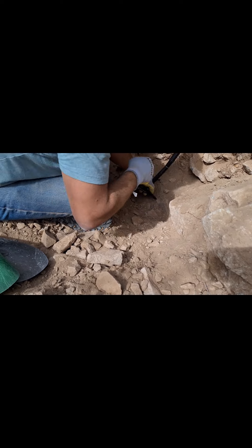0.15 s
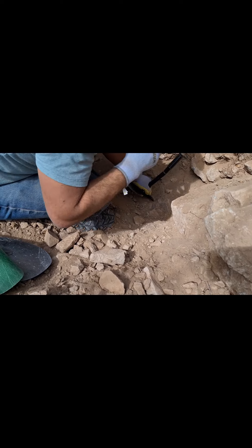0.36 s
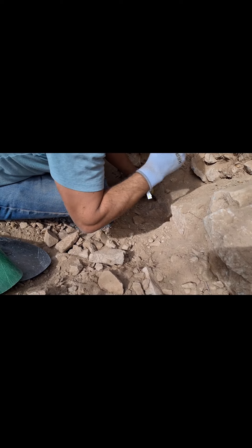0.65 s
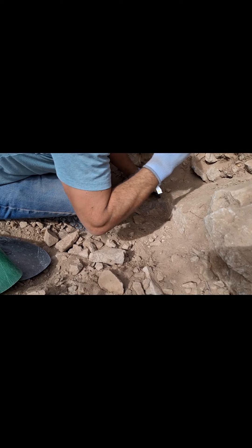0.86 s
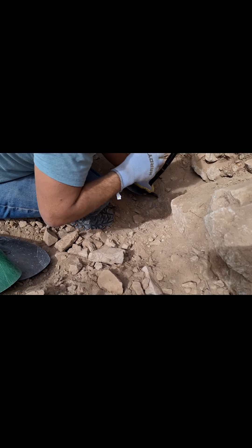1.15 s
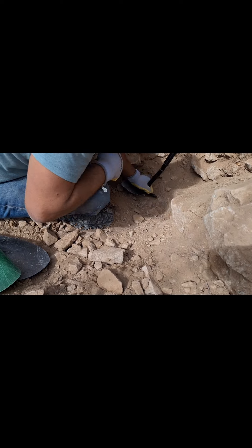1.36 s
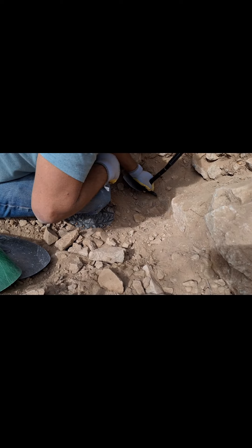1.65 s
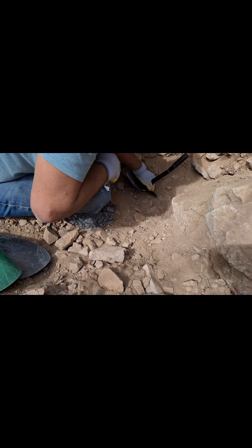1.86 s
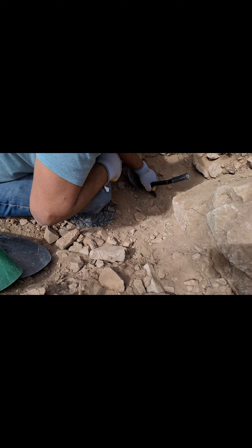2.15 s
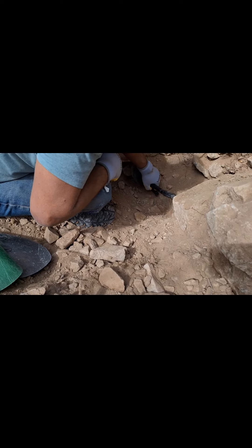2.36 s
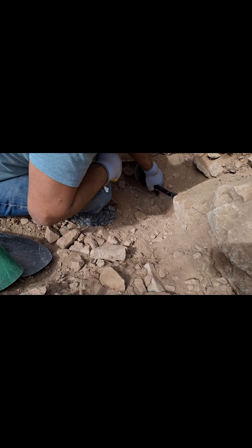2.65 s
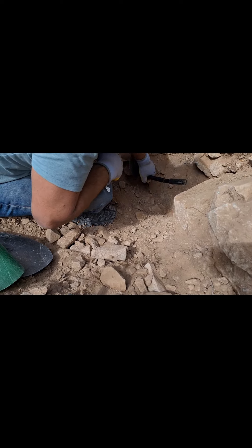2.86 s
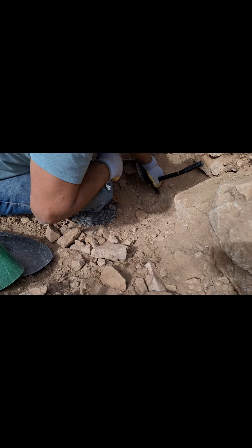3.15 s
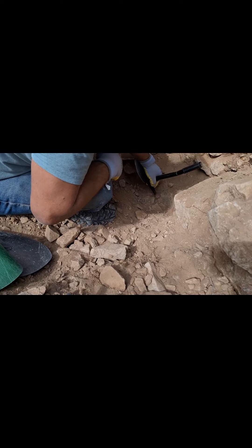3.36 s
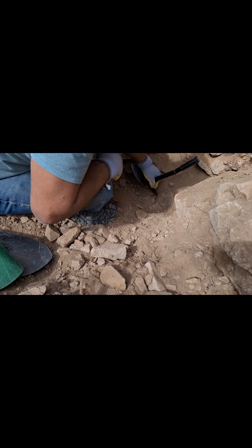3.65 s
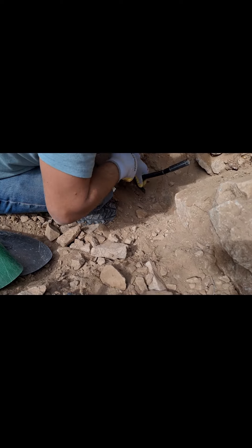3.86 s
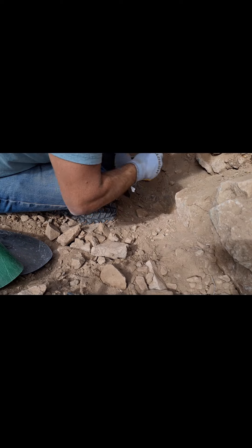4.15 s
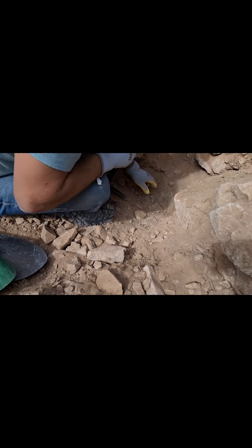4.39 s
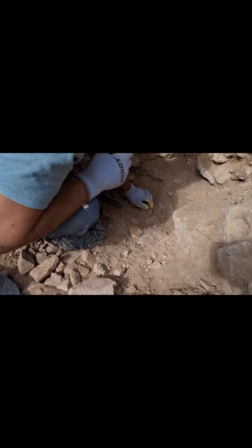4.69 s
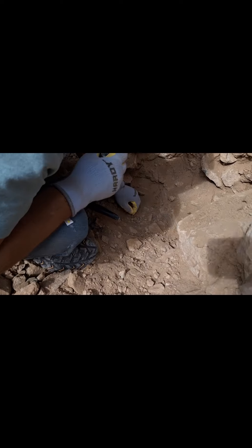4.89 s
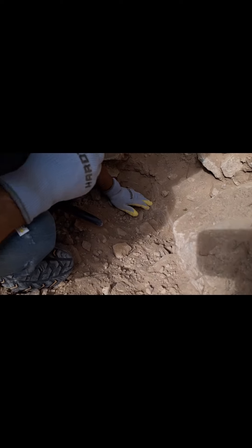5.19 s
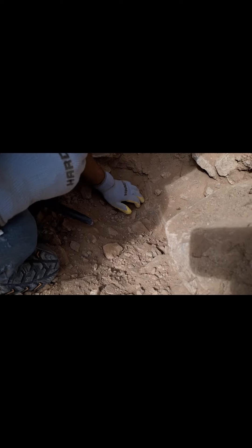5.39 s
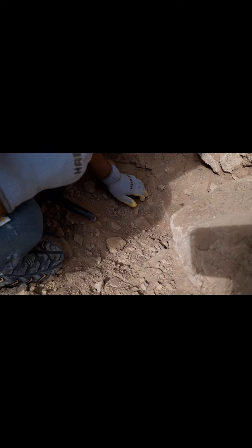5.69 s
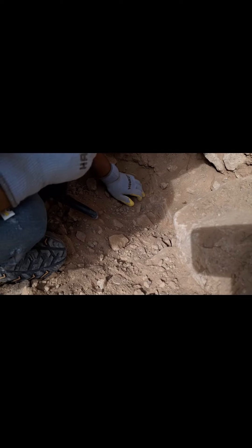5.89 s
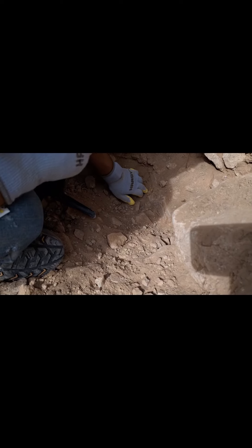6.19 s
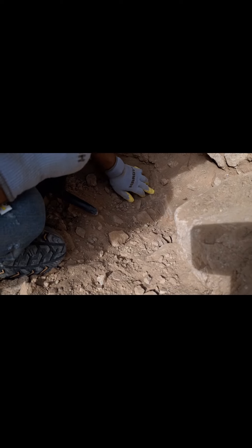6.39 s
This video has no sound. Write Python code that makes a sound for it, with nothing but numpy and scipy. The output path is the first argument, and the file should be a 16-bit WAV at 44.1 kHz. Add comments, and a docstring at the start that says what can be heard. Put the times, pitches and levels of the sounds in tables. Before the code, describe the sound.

Irregular chips and scrapes of a metal tool in packed earth and stones, slightly right of centre, crisp and dry without echo. Grit crackles brightly, pebbles tick, and low bumps shift clods. After about four seconds the metal stops; quieter, duller brushing by a gloved hand moves to the left and then back toward centre, with sand trickling and deep soft thumps. Quiet open air, light rumble and steady microphone hiss underneath.

```python
"""A gloved hand works a steel bar into hard, stony dirt, close to a hand-held camera outdoors.
Each chip or scrape is a burst of grit grains that rings bar, soil and pebbles.
After the bar is put down, the glove alone sweeps dirt and stones.
Loose dirt trickles between the crunches as two streams of grains; thuds are short low swings.
Swelling low rumble and steady microphone hiss, both coloured noise, lie underneath."""
import sys
import numpy as np
from scipy import signal
from scipy.fft import rfft, irfft, next_fast_len
from scipy.io import wavfile
from scipy.ndimage import uniform_filter1d, map_coordinates

SR = 44100
rng = np.random.default_rng(int(sys.argv[2]) if len(sys.argv) > 2 else 0)


def to_wav(sig):
    """Store sig (one row per channel, or 1-D mono) as 16-bit WAV at the path in sys.argv[1].

    Samples outside -1..1 are clipped; the rate is SR.
    """
    pcm = np.clip(np.atleast_2d(sig), -1, 1) * 32767
    pcm = np.round(pcm).astype(np.int16)
    wavfile.write(sys.argv[1], SR, pcm.T)  # frames by channels


N = 288119
PAD = next_fast_len(N)
T = np.arange(N) / SR  # time, s

# Each chip or scrape: peak t/s, crack level/dB, ring level/dB, favoured ring f/Hz, fine grit level/dB,
# rise/ms, fall/ms per 20 dB. Ring and grit levels are relative to the crack.
# Each layer below trims these levels and shortens the fall a little.
CRUNCHES = [(0.035, -50, 15.5, 1465, -11, 1.6, 18), (0.108, -65, 9.5, 636, 11, 20, 45),
            (0.121, -56.5, -3, 606, 7, 1.8, 13), (0.138, -61, 14, 1720, 2, 15, 23),
            (0.204, -79, -2, 755, 10.5, 27, 86), (0.292, -58, -0.5, 1010, 0, 4, 57),
            (0.34, -47.5, -2, 860, -4, 18.4, 35), (0.35, -35, -9, 1700, 4, 7.2, 11),
            (0.36, -33.5, -4.5, 1650, 1, 1.8, 19.5), (0.383, -56, 3, 1700, 1, 2, 32),
            (0.411, -58, -2, 970, 2, 14, 32), (0.442, -50.5, -2, 940, 8, 14, 24),
            (0.657, -73.5, 11.5, 1634, 6.5, 5.5, 39), (0.976, -56, -2, 1700, -5, 4.6, 26),
            (0.992, -52.5, 7, 1600, -10, 18, 24), (1.002, -52.5, -1.5, 1570, -6, 4.4, 50),
            (1.246, -57.5, 2.5, 1550, 5, 8, 17), (1.276, -72.5, 8, 1610, -2, 5.7, 39),
            (1.419, -55.5, 0, 1600, 0, 18, 22), (1.437, -54.5, 0, 1600, 0, 9.7, 30),
            (1.498, -44, -6, 1600, -3.5, 2.6, 14), (1.561, -38.5, -10, 925, 3.5, 2.3, 12.5),
            (1.588, -48.5, -3, 700, -1, 15, 38), (1.62, -34, -0.5, 920, 0, 23, 26),
            (1.658, -39.5, -3.5, 930, 5.5, 11.4, 8.5), (1.669, -35.5, -11, 1460, 4, 2.2, 29),
            (1.716, -63.5, 0.5, 1500, 5, 4, 13), (1.833, -43.5, 0.5, 1600, -7, 12, 12.5),
            (1.849, -59, -6.5, 630, 0, 3, 32), (1.891, -39.5, -7.5, 910, 0, 17.2, 23),
            (1.901, -29.5, -35, 1700, -5, 2.8, 20), (1.908, -28.5, -10.5, 1400, -3.5, 2.1, 20),
            (1.958, -46.5, 0.5, 1700, 1, 13, 9.5), (1.977, -40, -4, 1426, 2, 5.2, 30),
            (1.988, -29.5, -13, 1360, 4, 6.4, 10), (2.021, -42, -2.5, 994, 3, 30, 42),
            (2.135, -51, 2, 1540, -1, 3.9, 29), (2.164, -49, 0, 1550, 1, 3.7, 38),
            (2.186, -51.5, -2, 1600, -1.5, 6.4, 11), (2.303, -73, 7.5, 503, 11, 9, 27),
            (2.359, -58, 6, 523, 5.5, 35, 17.5), (2.383, -63, 6, 477, 1.5, 11, 28),
            (2.495, -48.5, -6, 1457, -5.5, 4.7, 30.5), (2.806, -45.5, -10, 1360, 0, 10, 24.5),
            (2.814, -31.5, -8.5, 1385, -1.5, 12.2, 35), (2.823, -28, -12.5, 940, 1, 6, 15.5),
            (2.829, -28, -12.5, 870, 0, 1.5, 19), (2.841, -33, 7.5, 493, -5, 3.3, 2.5),
            (2.865, -50.5, -1, 1490, -2, 7.3, 43), (2.879, -48, -3.5, 1480, 0, 6.4, 33),
            (2.918, -46.5, 3.5, 816, -7.5, 9.6, 30), (2.988, -75, 10, 1390, -13, 3.7, 23.5),
            (3.05, -87.5, 26, 676, 7, 7.4, 29.5), (3.075, -86, 22, 800, -1, 20, 37),
            (3.099, -78.5, 17.5, 830, -2, 3.7, 41), (3.188, -68, 2, 2590, 3, 27, 54),
            (3.251, -47, -5.5, 1840, -10, 7.1, 13), (3.267, -59, -2.5, 874, 2.5, 16, 46),
            (3.335, -64, -16, 2460, 2.5, 17, 57), (3.385, -50.5, -1.5, 1680, 2, 44, 25.5),
            (3.417, -42.5, -0.5, 874, 3, 38, 36), (3.688, -52, -0.5, 1450, -10, 2.8, 22),
            (3.703, -47, -4, 2540, -4.5, 11, 45.5), (3.723, -50.5, -7, 1510, 7.5, 2.4, 12),
            (3.783, -52.5, 2.5, 2020, 5.5, 4, 22.5), (3.811, -46, 0.5, 2570, -9, 3, 18),
            (4.142, -66.5, 0, 1720, -19.5, 8.3, 27), (4.195, -74, -1, 1670, -5, 6.7, 9),
            (4.23, -78, 13, 1690, 0, 13, 6), (4.263, -51, -2.5, 1730, -3.5, 16, 64.5),
            (4.325, -43, -4, 2200, -3, 7.2, 51), (4.397, -75, 2, 570, 4, 30, 45),
            (4.457, -66.5, 0.5, 1680, 2.5, 14, 21), (4.572, -78, 16.5, 576, -17, 4.6, 71),
            (4.734, -82, 18.5, 1600, -17, 84, 54), (4.774, -75.5, 15.5, 1300, -13, 62, 59),
            (4.85, -67, 10, 1310, -6, 130, 32), (4.876, -70.5, 20.5, 1340, -9, 15, 14),
            (4.98, -84, 21, 1100, -1, 74, 55), (5.21, -72.5, 0, 2050, 7, 35, 61.5),
            (5.297, -61, 0.5, 1420, 2, 86, 79), (5.347, -55.5, 5, 785, -5, 71, 59),
            (5.37, -57, 5.5, 1310, 4.5, 20, 36), (5.4, -59, 3, 920, -5, 66, 64),
            (5.621, -71, -0.5, 900, 7, 28, 31), (5.643, -62, 0.5, 700, 4, 15, 7),
            (5.661, -57.5, -8, 560, 2, 10, 9), (5.7, -64.5, 4, 840, -1, 110, 85),
            (5.745, -67.5, 2, 1495, -5, 16, 19), (5.914, -61, 5.5, 1310, 3, 7, 23),
            (5.952, -53, 6.5, 710, -3, 11.5, 10.5), (6.005, -73.5, 3, 914, -2, 140, 38),
            (6.172, -69, 7, 990, 15, 32, 24.5), (6.206, -69, 5.5, 790, 15.5, 17, 24),
            (6.273, -72.5, 2, 790, 17, 13, 37), (6.307, -58, -0.5, 2070, 1.5, 18, 19),
            (6.391, -60.5, -1.5, 1410, 2, 29, 41), (6.499, -68, 5.5, 804, 15, 12.5, 20),
            (6.519, -63, -1.5, 844, 9.5, 8.4, 15.5)]
# Where the digging lies as the camera turns: t/s, bearing (1 = well to the right, negative = left)
BEARING = [(0, 1.02), (2.3, 0.77), (3.8, 1.16), (4.3, 1.1), (5.2, -0.82), (6.53, -0.02)]
# Duller colour of loose fine grit throughout, and of crunched fine grit after 4.36 s: f/Hz, level/dB per Hz
SAND = [(3500, -29), (5500, -7.5), (7800, -1), (10000, -6), (13000, -2.5), (16000, -2)]

BAR_FLAT_S = 2.6  # the bar is then laid low to scrape and its lowest hum is choked
BAR_DOWN_S = 4.36  # from here on the glove alone sweeps dirt and stones
UPRIGHT, HELD = T < BAR_FLAT_S, T < BAR_DOWN_S
GLOVE_DAMP = 0.38  # cloth shortens every ring of soil and pebble to this share


def amplitude(db):
    """Turn decibels into a plain multiplier."""
    return 10 ** (np.asarray(db) / 20)


def unit(x):
    """Scale to an average (RMS) strength of 1."""
    return x / np.sqrt(np.mean(x ** 2))


def gains(points):
    """Read a colour table at every FFT bin."""
    hz, db = np.transpose(points)
    bin_hz = np.arange(PAD // 2 + 1) * SR / PAD
    return amplitude(np.interp(np.log(bin_hz + 1), np.log(hz), db))


def colour(x, points):
    """Filter by a colour; white input keeps its power."""
    return irfft(rfft(x, PAD) * unit(gains(points)), PAD)[..., :N]


def ring_modes(x, modes):
    """Strike a body that rings at several fading pitches; white input keeps its power, the tail is returned too."""
    t = np.arange(SR // 8) / SR
    body = np.zeros(len(t))
    for hz, db, t60 in modes:  # t60: seconds to fade by 60 dB
        body += amplitude(db - 60 * t / t60) * np.sin(2 * np.pi * hz * t) / np.sqrt(t60)
    body *= 1 - np.exp(-t / 0.00065)  # a contact takes a moment to build up
    return signal.fftconvolve(x, body[None] / np.sqrt(np.sum(body ** 2)))


def walk(rate):
    """Slow random wander of spread 1: noise averaged twice over 1/rate seconds."""
    k = int(SR / rate)
    return unit(uniform_filter1d(uniform_filter1d(rng.standard_normal(N), k), k))


def two_ports(mid, side, likeness):
    """Mix two noises into left and right that are alike by the given share."""
    return np.sqrt(1 + likeness) * mid + np.sqrt(1 - likeness) * side * np.array([[1], [-1]])


def grains(rate, spread_db, tail_ms, likeness):
    """Grit breaking: random clicks of very uneven size, at a rate per second, with short noisy tails."""
    clicks = rng.random(N) < rate / SR
    size = clicks * amplitude(spread_db * np.minimum(rng.exponential(size=N), 3.2))
    # every crunch breaks at least one fair-sized grain at its peak
    size[(np.transpose(CRUNCHES)[0] * SR).astype(int)] = amplitude(3.5)
    keep = np.exp(-2000 / (tail_ms * SR))  # amplitude falls to 1/e in tail_ms
    flutter = np.sqrt(signal.lfilter([1], [1, -keep], size ** 2))
    mid, side = rng.standard_normal((2, N))
    return unit(flutter * two_ports(mid, side, likeness))


def press(event, db, stretch):
    """How hard one event crushes grit: a ramp from first contact to the peak, then a fade."""
    s, *_, rise_ms, fall_ms = event
    rise_ms, fall_ms = max(rise_ms, 0.3), max(stretch * fall_ms, 1)
    start = max(int((s - rise_ms / 1000) * SR), 0)
    end = min(int((s + fall_ms / 400) * SR), N)  # 50 dB down
    near = slice(start, end)
    ms = 1000 * (T[near] - s)
    ramp = np.maximum(1 + ms / rise_ms, 0) ** 2
    return near, amplitude(db) * np.where(ms < 0, ramp, amplitude(-20 * ms / fall_ms))


def pressure(events, db, stretch):
    """The force of all events of a table together; powers add."""
    power = np.zeros(N)
    for event, top_db in zip(events, db):
        near, force = press(event, top_db, stretch)
        power[near] += force ** 2
    return np.sqrt(power)


def hand():
    """Uneven pressure of the hand, and its left-right balance as the bearing changes."""
    # left minus right: -1.5 dB at bearing 1, plus a chance wander
    pan_db = -1.5 * np.interp(T, *np.transpose(BEARING)) + 2 * walk(40)
    judder_db = 1.1 * walk(340)  # a scrape never presses evenly
    return amplitude(judder_db + pan_db * np.array([[0.5], [-0.5]]))


def crunches():
    """Add up the layers of every chip and scrape; returns their body and their fine grit."""
    grip = hand()
    body = hum_and_clods() + rings(grip) + crack_and_blade(grip) + pebbles(grip)
    return body, fine_grit(grip)


def rings(grip):
    """Each crunch rings the soil, and while held the bar's modes, strongest near its favoured pitch."""
    # Modes of the steel bar, damped by hand and soil: f/Hz, level/dB relative to each other
    bar_modes = [(520, -21), (640, 3), (860, -1.5), (935, 4.5), (1310, 3), (1460, 1.5), (1600, 1),
                 (1720, 2.5), (1850, -10.5), (1940, -2.5), (2200, -11.5), (2550, -7.5)]
    # Edge that thins the ring below the first modes and at the top: f/Hz, level/dB
    edge = [(200, -27), (400, -24), (500, -3.5), (3000, -0.5), (6000, -10)]
    bar_t60_s = 0.04
    out, grit = np.zeros((2, N + SR)), grip * grains(1200, 3.2, 0.4, 0.94)
    for crunch in CRUNCHES:
        s, crack_db, ring_db, hz = crunch[:4]
        near, force = press(crunch, crack_db + ring_db + 2, 0.95)
        damp = 1 if s < BAR_DOWN_S else GLOVE_DAMP
        # soil answers broadly: pitch as a multiple of the favoured one, dB, t60 in s
        soil = [(1, 0, 0.012), (0.55, -5, 0.008), (1.25, -7, 0.008), (1.7, -8, 0.006)]
        modes = [(ratio * hz, db, damp * t60) for ratio, db, t60 in soil]
        if s < BAR_DOWN_S:
            for f, db in bar_modes:
                octaves = np.log2(f / hz)
                # weaker away from the favoured pitch, and weaker still above it
                loss_db = 8 + min(40 * abs(octaves), 6) + 6.1 * max(octaves, 0)
                modes.append((f, db - loss_db, bar_t60_s))
        sound = ring_modes(force * grit[:, near], modes)
        out[:, near.start:near.start + sound.shape[1]] += sound
    return irfft(rfft(out[:, :N], PAD) * gains(edge), PAD)[:, :N]


def crack_and_blade(grip):
    """Breaking grit cracks as coloured noise and, while the bar is held, rings its tip."""
    # Colour of the crack: f/Hz, level/dB per Hz
    crack_colour = [(700, -22.5), (1800, -5), (2500, -9), (4500, -3.5), (6500, -6.5), (9000, -7),
                    (14000, -39)]
    # Modes of the bar's tip: f/Hz, level/dB relative to each other
    tip_modes = [(2780, -10), (3200, 0.5), (3900, -6.5), (4650, -9), (5500, -6), (7800, -0.5)]
    tip_t60_s = 0.022
    crack_db = np.transpose(CRUNCHES)[1]
    push = pressure(CRUNCHES, crack_db + 1.5, 0.9) * grip * grains(2000, 3.5, 0.3, 0.45)
    blade = ring_modes(push * HELD, [(hz, db, tip_t60_s) for hz, db in tip_modes])[:, :N]
    return colour(push, crack_colour) + amplitude(-11) * blade


def hum_and_clods():
    """Crunches and heaves drive the bar's lowest bends and the dull noise of shifting clods."""
    # Lowest bends of the bar: f/Hz, level/dB relative to each other, t60/s
    bends = [(208, -9.5, 0.092), (281.8, 3.5, 0.12), (338, -6, 0.0089)]
    # Colour of clods shifting: f/Hz, level/dB per Hz
    clod_colour = [(80, -30.5), (180, -7.5), (300, -0.5), (450, -6.5), (650, -0.5), (1000, -26.5)]
    # Bar or hand shifts a whole clod and the low sound swells: peak t/s, level/dB,
    # fall/ms per 20 dB before a slight shortening
    heaves = [(0.36, -48.5, 20), (0.996, -49.5, 39), (1.622, -51.5, 28), (1.66, -54.5, 22),
              (1.891, -52.5, 42), (1.987, -45, 15), (2.382, -65, 23), (2.829, -43.5, 14), (2.842, -40, 9),
              (2.875, -49, 37), (2.92, -48, 26), (3.089, -61.5, 18), (3.725, -57, 5), (4.263, -60.5, 62),
              (4.327, -44.5, 43), (4.396, -53.5, 42), (4.573, -58, 48), (4.625, -63, 82),
              (5.344, -55.5, 58), (5.688, -61, 61), (5.95, -55, 11.5)]
    heave_rise_ms = 12
    _, crack_db, ring_db, *_ = np.transpose(CRUNCHES)
    # -69 dB for a medium ring of -52.5 dB; grows more slowly than the ring, 0.6 dB per dB
    hum_db = -69 + 0.6 * (crack_db + ring_db + 52.5)
    heave_events = [(s, heave_rise_ms, fall_ms) for s, _, fall_ms in heaves]
    heave = pressure(heave_events, np.transpose(heaves)[1], 0.95)
    force = np.hypot(pressure(CRUNCHES, hum_db, 0.88), heave)
    low = force * grains(610, 0.87, 0.5, 0.9)
    # bar upright: mostly hum; laid low: mostly clods; put down: clods only
    hum = ring_modes(low * np.where(UPRIGHT, 1, amplitude(-12.5) * HELD), bends)[:, :N]
    return hum + colour(low * np.where(UPRIGHT, amplitude(-12.5), 1), clod_colour)


def pebbles(grip):
    """Every crunch clicks six pebbles of chance pitch and strength."""
    out, grit = np.zeros((2, N + SR)), grip * grains(1200, 4.5, 0.3, 0.75)
    for crunch, chance in zip(CRUNCHES, rng.random((len(CRUNCHES), 6, 2))):
        near, force = press(crunch, crunch[1] - 1.5, 0.8)
        damp = 1 if crunch[0] < BAR_DOWN_S else GLOVE_DAMP
        modes = [(2700 * 3.8 ** u, -8 * v, damp * 0.014) for u, v in chance]
        sound = ring_modes(force * grit[:, near], modes)
        out[:, near.start:near.start + sound.shape[1]] += sound
    return out[:, :N]


def fine_grit(grip):
    """The smallest grains hiss brightly at first, then more dully after 4.36 s."""
    # Colour of fine grit before 4.36 s: f/Hz, level/dB per Hz
    bright_colour = [(4000, -31), (7000, -7), (9000, -7.5), (11500, 2.5), (14500, 5), (16000, -3.5)]
    _, crack_db, _, _, fine_db, *_ = np.transpose(CRUNCHES)
    rasp = pressure(CRUNCHES, crack_db + fine_db + 4, 0.73) * grip * grains(3300, 2, 0.91, 0.16)
    return colour(rasp * HELD, bright_colour) + colour(rasp * ~HELD, SAND)


def trickle():
    """Loose dirt sliding: a dull and a fine stream of grains that swell together."""
    # Flow of loose dirt and cloth between crunches: t/s, level/dB
    flow = [(0.11, -61.5), (0.27, -77.5), (0.69, -82), (1.33, -85.5), (1.53, -69), (1.68, -65), (1.79, -81),
            (1.95, -62.5), (2.13, -76.5), (2.84, -86.5), (3.14, -74.5), (3.47, -78), (3.72, -89),
            (3.86, -73.5), (4.16, -76), (4.32, -72.5), (4.84, -69), (5.03, -73.5), (5.42, -78.5),
            (6.04, -84.5), (6.33, -71), (6.53, -79.5)]
    # Colour of the dull stream: f/Hz, level/dB per Hz
    dirt_colour = [(150, -19), (400, -0.5), (1300, -8.5), (2500, -8.5), (4500, -13.5), (9000, -14.5)]
    flow_db = np.interp(T, *np.transpose(flow)) + 0.6 * walk(30)
    dull = amplitude(flow_db) * colour(grains(2900, 0.93, 0.8, 0.21), dirt_colour)
    fine = amplitude(flow_db - 6.5) * colour(grains(4000, 2, 0.56, 0.25), SAND)
    return dull, fine


def thuds():
    """Thuds through the ground: short low swings that build up fast and fade, the same at both ports."""
    # Thuds: start t/s, level/dB at the start of the fade, f/Hz
    thud_list = [(0.365, -44.5, 111), (1.621, -51, 94), (1.916, -44, 106), (2.827, -48, 95),
                 (3.081, -47.5, 93), (4.258, -49, 134), (4.33, -57, 70.5), (4.561, -63, 70),
                 (4.79, -49, 71.4), (5.328, -46.5, 73), (5.922, -37, 95), (5.95, -39.5, 113)]
    t60_s, build_s = 0.12, 0.00089
    out = np.zeros(N)
    for s, db, hz in thud_list:
        t = np.maximum(T - s, 0)
        swing = amplitude(db - 60 * t / t60_s) * np.sin(2 * np.pi * hz * t)
        out += swing * (1 - np.exp(-t / build_s))
    return out


def air():
    """Noise split near 220 Hz: swelling rumble, mostly alike left and right, and steady, less alike hiss."""
    # Colour of the background: f/Hz, level/dB per Hz
    air_colour = [(15, -33.5), (25, -2), (77, 4.5), (198, -12.5), (274, -17.5), (567, -34), (826, -33.5),
                  (5280, -39), (5880, -40.5), (15500, -36)]
    # Swell of the distant rumble: t/s, level/dB before its wander and left-right offset
    rumble_swell = [(0.0, -69), (1.8, -67), (2.1, -58), (2.4, -68), (4.04, -68.5), (4.42, -61), (5.27, -68),
                    (5.7, -63), (6.0, -63), (6.53, -61)]
    air_db = -63  # level of the whole noise, from which the hiss is cut
    hz = np.arange(PAD // 2 + 1) * SR / PAD
    likeness = np.clip(0.9 - 0.16 * np.log2(np.maximum(hz, 90) / 90), 0, 1)  # less alike with pitch
    mid, side = rfft(rng.standard_normal((2, PAD))) * unit(gains(air_colour))
    both = two_ports(mid, side, likeness)
    low = 1 / (1 + (hz / 220) ** 4)
    rumble = irfft(both * low, PAD)[:, :N]
    hiss = irfft(both * (1 - low), PAD)[:, :N]
    swell_db = np.interp(T, *np.transpose(rumble_swell)) + 2.5 * walk(5.5)
    swell = amplitude(swell_db + np.array([[0.8], [-0.8]]))  # a little stronger on the left
    whole_rms = np.sqrt(np.mean((rumble + hiss) ** 2))
    return unit(rumble) * swell + hiss * amplitude(air_db) / whole_rms


def scene():
    """Place the digging by its bearing: the far port is shaded in the treble, and the left port lags or leads."""
    lag_samples, shadow_db = 2, 4.5  # at bearing 1: left port later, and its treble below the right's
    grit_lag_share = 0.58  # the finest grit reaches the ports round the camera body with less lag
    bearing = np.interp(T, *np.transpose(BEARING))
    body, grit = crunches()
    dull, fine = trickle()
    low = body + dull
    high = (grit + fine) * amplitude(shadow_db * bearing * np.array([[-0.5], [0.5]]))
    left = np.zeros(N)
    for part, share in ((low, 1), (high, grit_lag_share)):
        moment = np.arange(N) - share * lag_samples * bearing
        left += map_coordinates(part[0], [moment], order=5)
    return np.array([left, low[1] + high[1]]) + thuds() + air()


def record(dry):
    """The microphone falls away at the top, then the recorder cuts it."""
    mic_top_hz, top_hz = 15600, 16785
    mic = signal.sosfilt(signal.cheby1(8, 0.5, mic_top_hz, fs=SR, output="sos"), dry)
    return signal.sosfilt(signal.ellip(8, 0.2, 70, top_hz, fs=SR, output="sos"), mic)


dry = scene()
out = record(dry)
to_wav(out)
```